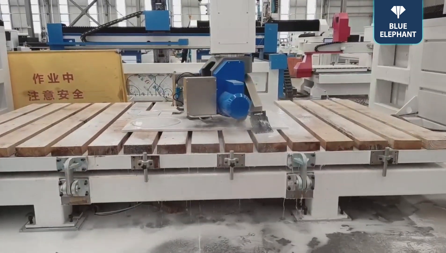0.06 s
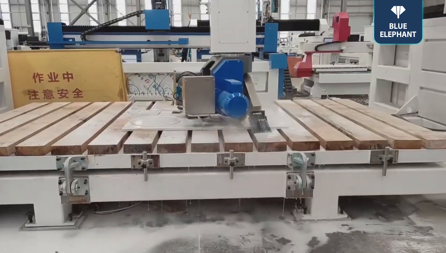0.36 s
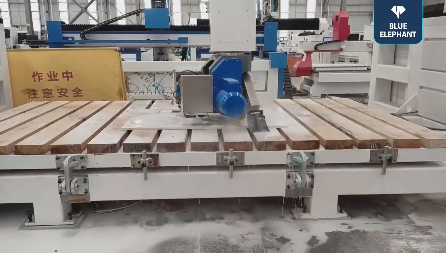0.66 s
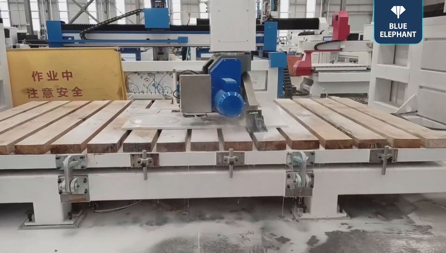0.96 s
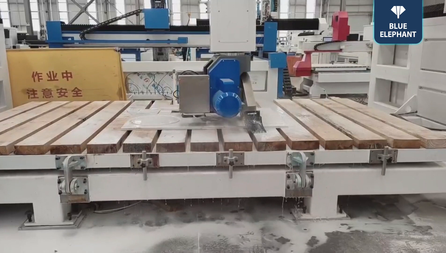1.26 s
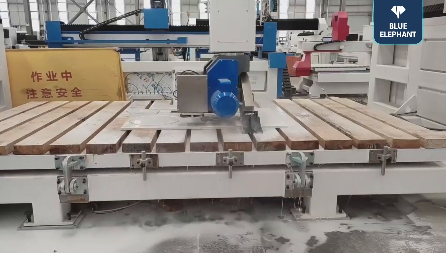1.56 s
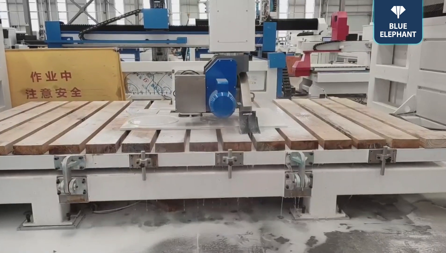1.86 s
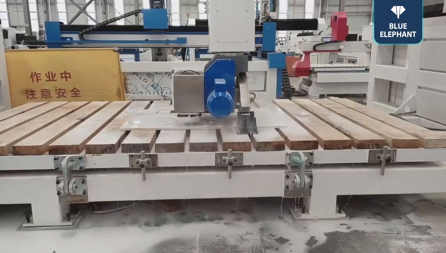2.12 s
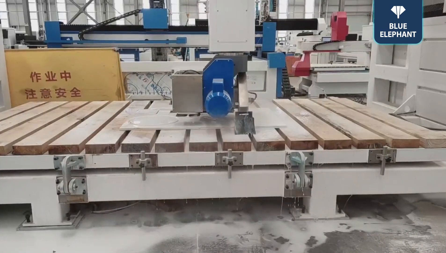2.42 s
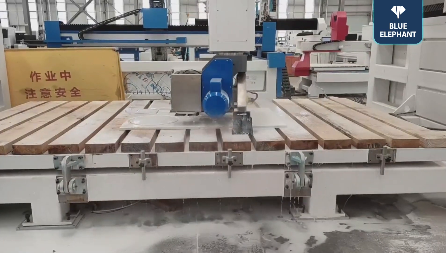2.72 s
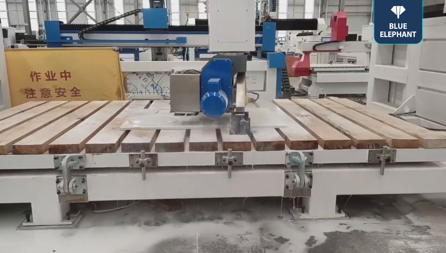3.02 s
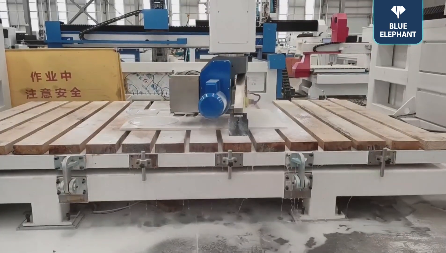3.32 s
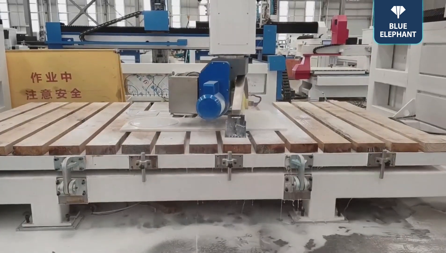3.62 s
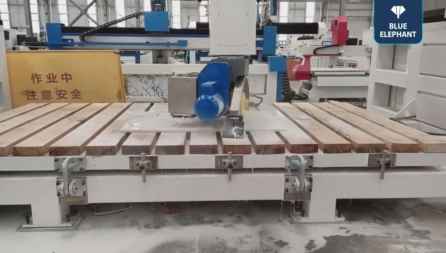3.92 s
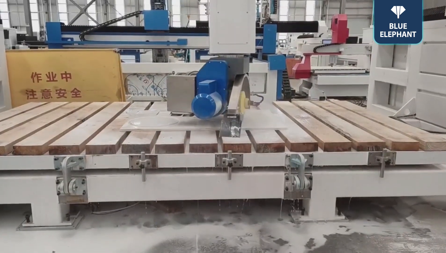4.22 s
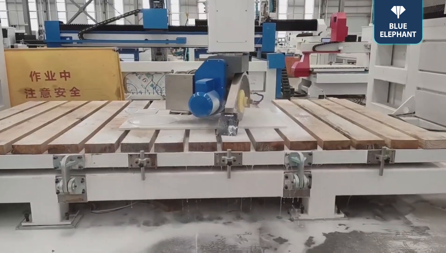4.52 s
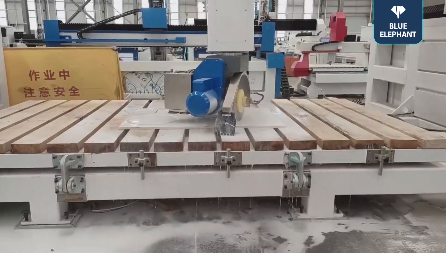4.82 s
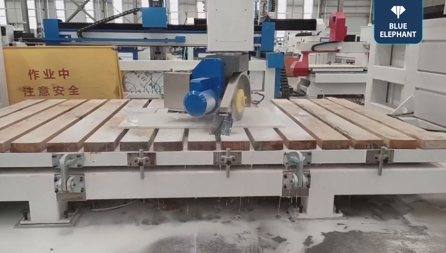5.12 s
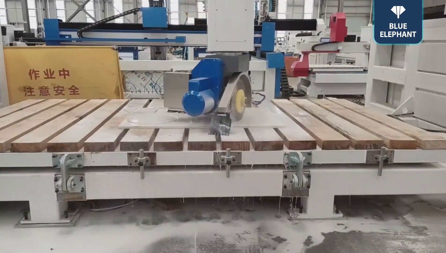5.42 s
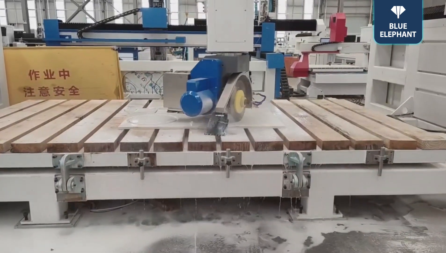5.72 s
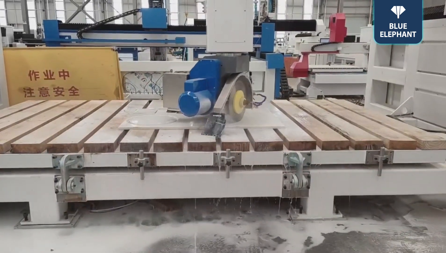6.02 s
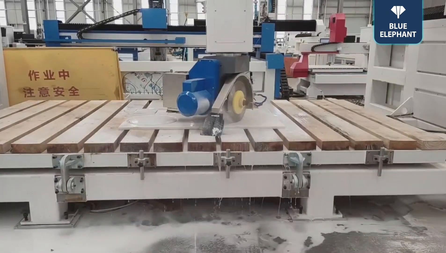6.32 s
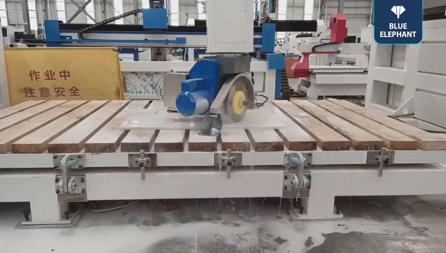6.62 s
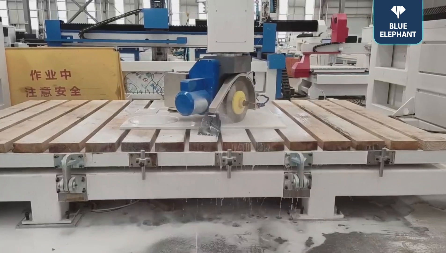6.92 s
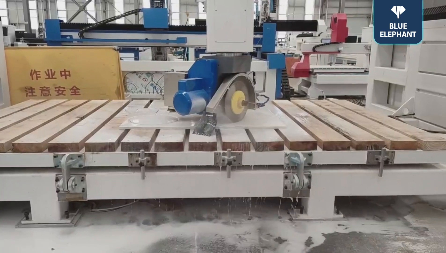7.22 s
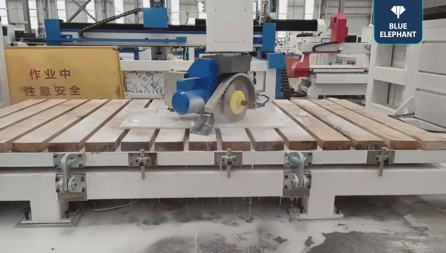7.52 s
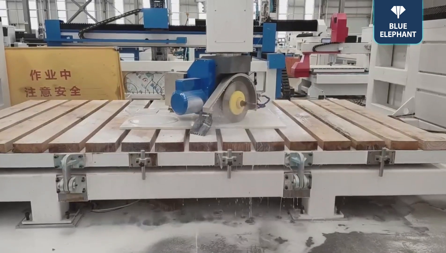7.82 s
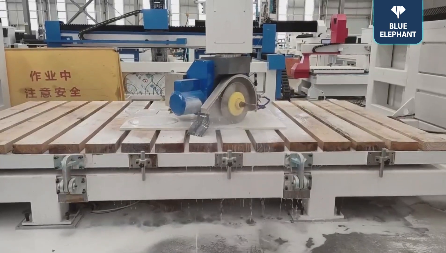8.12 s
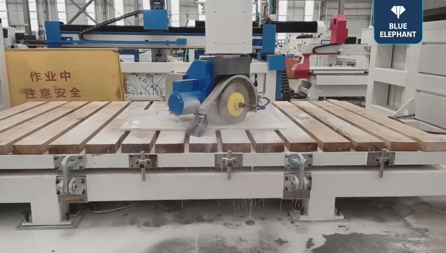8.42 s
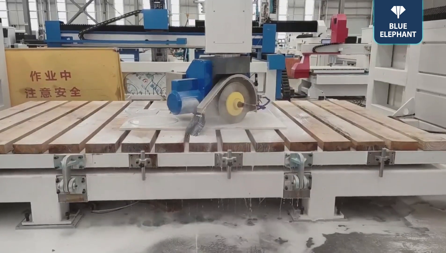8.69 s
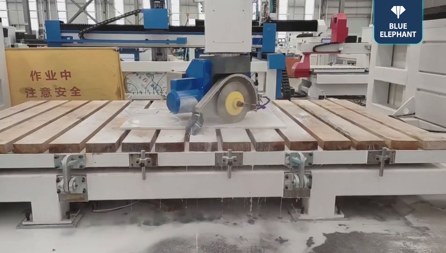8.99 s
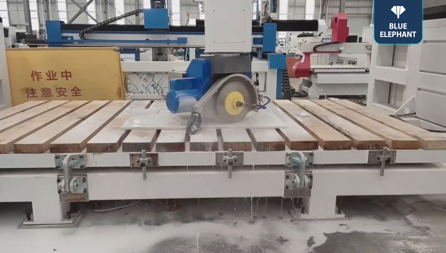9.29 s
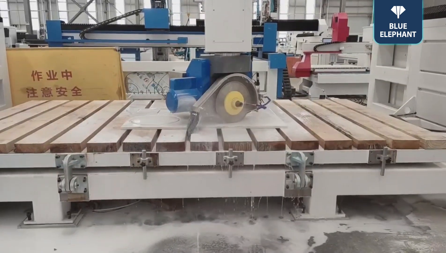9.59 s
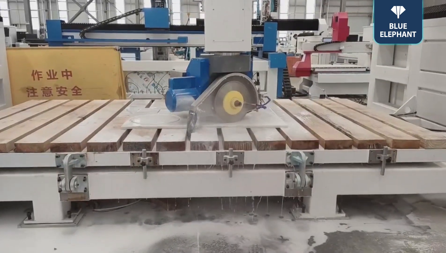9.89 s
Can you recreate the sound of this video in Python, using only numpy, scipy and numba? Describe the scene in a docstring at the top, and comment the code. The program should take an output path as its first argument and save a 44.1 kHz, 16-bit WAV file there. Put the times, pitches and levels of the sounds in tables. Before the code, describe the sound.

A stone-cutting saw runs without a break in a factory hall, its motor and blade making a harsh buzz with several high whining tones. Cooling water hisses off the rim and makes the steel disc ring, while a faint hum throbs underneath. Heard from a fixed spot, the tones swell and fade as the head swivels, and the hum dies away near the end.

```python
"""A harsh, steady buzz in a hiss of water: a bridge saw spins its diamond blade in a factory hall.
Motor and blade repeat one buzz every turn of the shaft. Its partials (the pure tones it is made of)
go out in lobes, like beams, that sweep past us as the cutting head swivels round.
Cooling water sprays off the rim and rings the steel disc, air rushes round it, and a low hum
throbs underneath."""
import sys
import numpy as np
from scipy import signal
from scipy.fft import rfft, irfft, next_fast_len
from scipy.io import wavfile
from scipy.ndimage import uniform_filter1d
from numba import njit

SR = 44100
rng = np.random.default_rng(int(sys.argv[2]) if len(sys.argv) > 2 else 0)


def dump(signal):
    """Clip the signal to [-1, 1] and save it as 16-bit WAV at the path in sys.argv[1]."""
    limited = np.clip(np.atleast_2d(signal).T, -1, 1)
    pcm = np.round(limited * 32767).astype(np.int16)
    wavfile.write(sys.argv[1], SR, pcm)


N = 438794
HOP = 147  # samples in a frame, the time step for slow changes
TIME = np.arange(N) / SR
FRAME_TIME = np.arange(N // HOP + 2) * HOP / SR
FREQ = np.maximum(np.fft.rfftfreq(next_fast_len(N), 1 / SR), 1)

# The rushing noise has five bands. Each entry: the pitch in Hz where one hands over to the next.
HANDOVER_HZ = [980, 4720, 5820, 7450]


def undb(db):
    """Turn decibels into a factor to multiply by."""
    return 10 ** (np.asarray(db) / 20)


def curve(rows):
    """Join (seconds, value) points with straight lines."""
    return np.interp(TIME, *np.transpose(rows))


def spectrum_db(points, hz):
    """Read a level between (Hz, dB) points, giving every octave the same room."""
    points_hz, db = np.transpose(points)
    return np.interp(np.log(hz), np.log(points_hz), db)


def noise(gain):
    """Random noise shaped by one gain for each frequency."""
    size = next_fast_len(N)
    return irfft(rfft(rng.standard_normal(size)) * gain, size)[:N] * np.sqrt(SR / 2)


def walk(rate_hz, count=1):
    """Rows of smooth random wandering, one value a frame, about 1 in size and mostly below rate_hz."""
    size = 4096
    keep_slow = np.exp(-(np.fft.rfftfreq(size, HOP / SR) / rate_hz) ** 2)
    rows = irfft(rfft(rng.standard_normal((count, size))) * keep_slow, size)
    return (rows / rows.std())[:, :len(FRAME_TIME)]


def sway(rate_hz):
    """One random wander with a value for every sample."""
    return np.interp(TIME, FRAME_TIME, walk(rate_hz)[0])


def swell(time, peak_s, rise_s):
    """A smooth rise from 0 to 1 and an equally long fall."""
    return np.cos(np.pi / 2 * np.clip((time - peak_s) / rise_s, -1, 1)) ** 2


def lobe_db(time, depth_db, facing_s, period_s):
    """The level drops as a lobe turns away from us; a negative depth makes it rise instead."""
    return -depth_db * np.sin(np.pi * (time - facing_s) / period_s) ** 2


def beam_db(hz):
    """A partial rises and falls as its lobe sweeps past; its average power stays the same."""
    # Neighbouring partials share a lobe. Each row: lowest pitch in Hz, depth in dB,
    # time it faces us in seconds, seconds between lobes.
    lobes = [(70, 2, 2, 9.5), (170, 12, 10.65, 11.7), (220, 15, 2.2, 14.9), (270, 2.5, 1.7, 3.85),
             (370, 7.5, 2.4, 10.1), (500, 11.5, 4.28, 8.3), (710, 6.5, 4, 9.5), (860, 3.5, 6, 4.7),
             (1250, 7, 3.3, 10.3), (1400, 5.5, 12, 17.5), (1640, 8.5, 3.5, 8.4), (1930, 4.5, 5.44, 6.1),
             (3000, 6.5, 5.3, 13.7), (3680, 10.5, 9.4, 13.2), (3840, 2.5, 2.65, 4.2), (4140, 8, 3.3, 8.9),
             (4690, 6.5, 6.1, 10.3), (5230, 10, 6.27, 8.67)]
    lobe = ([row for row in lobes if row[0] <= hz] or lobes[:1])[-1]
    db = lobe_db(FRAME_TIME, *lobe[1:])
    return db - 10 * np.log10(np.mean(undb(db) ** 2))


def flare_db(hz, width_hz):
    """Now and then the partials near one pitch swell and fade."""
    # Each row: time of the peak in seconds, pitch in Hz, lift in dB, rise time in seconds.
    flares = [(0.398, 5150, 4, 1), (0.505, 5774, 8.5, 1.5), (.5, 6018, 7, 1.2), (1.1, 1780, 2.5, 0.63),
              (1.5, 3965, 2, .3), (2.35, 4503, 4.5, 0.99), (3.127, 3965, 4, .3), (4.2, 1762, 3, 0.87),
              (4.35, 3715, 8, 1.1), (4.85, 4503, 5, 0.57), (7, 6018, 3.5, 1.2), (8.6, 3719, 1.5, 0.14)]
    db = 0
    for peak_s, centre_hz, lift_db, rise_s in flares:
        nearness = np.exp(-((hz[:, None] - centre_hz) / width_hz) ** 2)
        db = db + lift_db * swell(FRAME_TIME, peak_s, rise_s) * nearness
    return db


def knock_and_rasp(orders, on_rim, height, knock_turns=0.3, chirp_turns=.045, rasp_rad=1.5):
    """Phases (timing within a turn) that make the low partials knock and the rim's partials rasp."""
    count = len(orders)
    # each turn starts with a dying knock, which ties neighbouring partials together
    turn = np.linspace(0, 1, 4 * count)
    knock = rng.standard_normal(len(turn)) * np.exp(-turn / knock_turns)
    # higher partials come a little later, so the knock chirps upward
    phase = np.angle(rfft(knock))[orders] - np.pi * chirp_turns * orders ** 2
    # rim tones wobble in pitch once a turn, setting neighbours about a quarter cycle apart
    phase = np.where(on_rim, rasp_rad * (orders % 2), phase)
    # paths through the hall change as the head turns, most for short waves
    drift = 1.63 * np.sqrt(height) * walk(0.51, count)
    # each stretch of the rim's partials has its own delay within the turn
    delay_turns = np.cumsum(rng.standard_normal(count)) * chirp_turns
    phase = phase + 2 * np.pi * np.cumsum(delay_turns) * on_rim
    return phase[:, None] + drift


@njit
def add_partials(angle, gains, hop):
    """Add tones at multiples of the shaft angle; complex gains (level and phase) glide between frames."""
    out = np.zeros(len(angle))
    for i in range(len(angle)):
        frame, blend = i // hop, (i % hop) / hop
        step, tone = np.exp(1j * angle[i]), 1 + 0j
        for k in range(gains.shape[1]):
            tone *= step
            gain = gains[frame, k] + blend * (gains[frame + 1, k] - gains[frame, k])
            out[i] += (tone * gain).real
    return out


def saw_buzz(angle, shaft_hz, count=180, rim_from_hz=3252, blade_trim_db=-0.63):
    """Motor and blade repeat one buzz every shaft turn; its tone shifts as the head swivels."""
    # Strong partials of the motor and its drive. Each row: multiple of the shaft speed, base level in dB.
    motor_partials = [(2, -56.2), (4, -50.0), (5, -37.4), (6, -49.5), (7, -43.9), (8, -44.7), (9, -51.9),
                      (13, -38.3), (14, -49.7), (15, -46.2), (16, -51.7), (20, -50.5), (22, -52.3),
                      (24, -50.1), (27, -46.4), (28, -47.0), (29, -46.8), (30, -42.2), (31, -46.0),
                      (34, -45.6), (36, -37.1), (37, -42.9), (40, -45.5), (48, -42.8), (49, -45.9),
                      (54, -48.3), (62, -42.6), (63, -43.9), (64, -46.1), (65, -44.2), (66, -44.2)]
    # Strong partials of the blade's segmented rim, with the same columns.
    blade_partials = [(69, -43.9), (73, -37.7), (74, -38.4), (75, -36.7), (76, -34.4), (77, -38.0),
                      (78, -39.7), (80, -37.0), (81, -36.7), (82, -39.4), (84, -41.2), (92, -35.1),
                      (96, -40.4), (97, -42.7), (101, -44.6), (102, -39.3), (103, -43.4), (104, -42.1),
                      (105, -41.2), (106, -42.4), (114, -42.2), (115, -40.4), (116, -36.4), (117, -39.9),
                      (118, -34.3), (121, -40.9), (123, -36.0), (133, -52.2), (139, -52.7), (169, -56.6)]
    # The weaker partials between them. Each row: pitch in Hz, base level in dB.
    weak_levels = [(150, -68), (500, -58), (1100, -55), (1600, -51.5), (2200, -61.5), (2800, -62.5),
                   (3300, -49), (4300, -48.5), (5300, -49), (6300, -50), (6700, -67), (7800, -112),
                   (8600, -56.5)]
    orders = np.arange(1, count + 1)
    hz = shaft_hz * orders
    height = (orders / count)[:, None]  # near 0 for the lowest partial, 1 for the highest
    beam = np.array([beam_db(f) for f in hz])
    wander = height ** 0.26 * walk(0.16, count)
    db = spectrum_db(weak_levels, hz)[:, None] + 0.28 * beam + 5.0 * wander
    db[0] = -np.inf  # the lowest partial belongs to the throb
    # water loads the rim unevenly, so high partials flutter most
    flutter_depth = 0.055 + 0.35 * height
    for table, trim_db in ((motor_partials, 0), (blade_partials, blade_trim_db)):
        for order, base_db in table:
            k = int(order) - 1
            db[k] = base_db + trim_db + beam[k] + 1.75 * wander[k]
            flutter_depth[k] *= 0.94  # strong partials hold a little steadier
    flutter = flutter_depth * (walk(19.5, count) + 1j * walk(4.1, count))
    # neighbouring partials ride on the same vibration of the disc and surge together
    surge = uniform_filter1d(walk(17, count), size=9, axis=0)
    db = db + 1.26 * np.sqrt(height) * surge / surge.std() + flare_db(hz, width_hz=73)
    phase = knock_and_rasp(orders, hz > rim_from_hz, height)
    gains = np.sqrt(2) * undb(db) * np.exp(1j * phase) * (1 + flutter)
    return add_partials(angle, np.ascontiguousarray(gains.T), HOP)


def guard_echoes_db(depth, count=14):
    """Quick echoes inside the blade guard lift some pitches and lower others, least in the bass."""
    delays_s = rng.uniform(0.001056, .008, count)
    ripple = sum(np.cos(2 * np.pi * FREQ * delay) for delay in delays_s) * np.sqrt(2 / count)
    return depth * ripple * FREQ / (FREQ + HANDOVER_HZ[0])


def air_and_water(angle, trim_db, flicker_db, gush_db, pulse_depth, shade_from_s, shade_db_per_s):
    """Five bands of rushing noise each sweep past, gush, flicker and pulse a little with the blade."""
    # The tone of the whole rush. Each row: pitch in Hz, base level in dB for a slice 1 Hz wide.
    rush_levels = [(25, -75), (75, -75.5), (150, -72.5), (550, -72.5), (1050, -77.5), (1400, -66),
                   (1800, -64.5), (2750, -68), (3750, -63), (5900, -69), (6700, -76), (7800, -79),
                   (8500, -76.5), (9600, -78.5), (11200, -76.5)]
    # From low to high: motor fan, wash in the guard, jet on the disc, spray off the rim, fine mist.
    # Each row: gain in dB, lobe depth in dB, time it faces us in seconds, seconds between lobes.
    bands = [(0.5, 8.5, 3, 10.5), (-4, 3.5, 3.9, 13.7), (1.5, 14, 6.1, 14.4), (7.5, 6, 4, 5.4),
             (1, 1.5, 7.3, 9.8)]
    # Gusts blow mist our way. Each row: time of the peak in seconds, lift in dB, rise time in seconds.
    mist_gusts = [(4.6, 1, 0.37), (5.9, 3, 0.88), (8.803, 3, 0.82)]
    below = [0] + [1 / (1 + (FREQ / hz) ** 20) for hz in HANDOVER_HZ] + [1]
    colour = undb(spectrum_db(rush_levels, FREQ) + trim_db + guard_echoes_db(depth=4.0))
    # late in the swivel the guard comes between us and the spray off the rim
    shade_db = shade_db_per_s * np.maximum(TIME - shade_from_s, 0)
    gusts_db = sum(lift_db * swell(TIME, peak_s, rise_s) for peak_s, lift_db, rise_s in mist_gusts)
    extra_db = [0, 0, 0, -shade_db, gusts_db]
    out = 0
    for k, (gain_db, *lobe) in enumerate(bands):
        band = noise(colour * np.sqrt(np.abs(below[k + 1] - below[k])))
        pulse = 1 + pulse_depth * np.cos(angle + rng.uniform(0, 2 * np.pi))
        unsteady_db = gush_db * sway(1.0) + flicker_db * sway(11.6)
        out = out + band * pulse * undb(gain_db + lobe_db(TIME, *lobe) + extra_db[k] + unsteady_db)
    return out


def disc_ringing(trim_db, swell_db):
    """Water strikes the steel disc at random and keeps its own tones ringing, in uneven swells."""
    # Each row: pitch in Hz, width in Hz (wider is rougher), base level in dB, lobe depth in dB,
    # a time in seconds when the lobe leaves the level unchanged, seconds between lobes.
    disc_tones = [(1725, 100, -45, 17, 2, 16), (3670, 140, -41, 15, 9.6, 5), (3967, 16, -34, -3, 4.6, 3.5),
                  (4506, 10, -46.5, -7, 3.3, 13), (4714, 54, -34, -1.5, 11, 23),
                  (5830, 10, -29.5, 18, 4.1, 17), (5778, 11, -32, 19, 5.3, 7.6),
                  (6015, 12, -39, 11, 4.5, 15)]
    out = 0
    for hz, width_hz, base_db, *lobe in disc_tones:
        phase = 2 * np.pi * hz * TIME
        rough_tone = sway(width_hz) * np.cos(phase) + sway(width_hz) * np.sin(phase)
        out = out + rough_tone * undb(base_db + trim_db + lobe_db(TIME, *lobe) + swell_db * sway(0.41))
    return out


def shaft_throb(angle, other_hz, other_db):
    """The unbalanced shaft hums, drifting in and out of step with a slightly faster machine."""
    # Each row: time in seconds, level of the shaft's hum in dB.
    throb_levels = [(0, -54), (1.6, -51), (2.3, -45.5), (4, -49.5), (4.7, -56), (5.5, -45), (6.4, -58),
                    (7.1, -52), (8.2, -65), (9.95, -72)]
    other_machine = np.sin(2 * np.pi * other_hz * TIME + 0.43 * sway(1))
    return (np.sin(angle) + undb(other_db) * other_machine) * undb(curve(throb_levels))


def low_drone(hz):
    """A low, slightly wavering drone swells briefly and fades."""
    # Each row: time in seconds, level in dB.
    drone_levels = [(0, -58), (.5, -60), (1, -58), (1.2, -48), (1.5, -45), (1.7, -61), (3, -63),
                    (9.95, -87)]
    tone = np.sqrt(2) * np.sin(2 * np.pi * hz * TIME + .5 * sway(2.5))
    return tone * undb(curve(drone_levels))


def blade_draught(centre_hz, width_hz, gain_db, facing_s, fade_s):
    """Air thrown off the blade rumbles while its edge points at us."""
    colour = 1 / (1 + ((FREQ - centre_hz) / width_hz) ** 4)
    return noise(colour) * undb(gain_db) * np.exp(-((TIME - facing_s) / fade_s) ** 2)


def scene():
    """All the sounds of the running saw add up, the same in both channels."""
    # The shaft's speed drifts a little. Each row: time in seconds, turns per second.
    shaft_speeds = [(0, 48.925), (1.8, 48.97), (3, 48.95), (4.2, 48.905), (6.2, 48.935), (7.2, 48.91),
                    (8.3, 48.94), (9.95, 48.955)]
    shaft_hz = curve(shaft_speeds)
    angle = 2 * np.pi * np.cumsum(shaft_hz) / SR
    buzz = saw_buzz(angle, shaft_hz.mean())
    rush = air_and_water(angle, trim_db=1.66, flicker_db=0.89, gush_db=0.27, pulse_depth=0.075,
                         shade_from_s=7, shade_db_per_s=7.5)
    rumble = blade_draught(centre_hz=138, width_hz=33, gain_db=-66, facing_s=3.8, fade_s=2.1)
    steel = disc_ringing(trim_db=-7.5, swell_db=2.0)
    throb = shaft_throb(angle, other_hz=54.3, other_db=-0.5)
    mono = buzz + rush + rumble + steel + throb + low_drone(hz=119.7)
    return np.array([mono, mono])


def record(dry):
    """A steep filter cuts the treble above 11500 Hz."""
    return signal.sosfilt(signal.ellip(10, .2, 80, 11500, fs=SR, output="sos"), dry)


dry = scene()
out = record(dry)
dump(out)
```